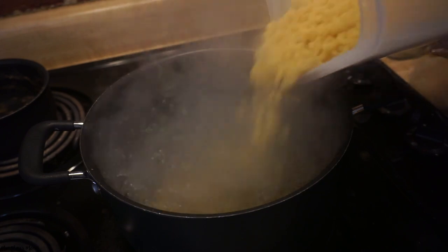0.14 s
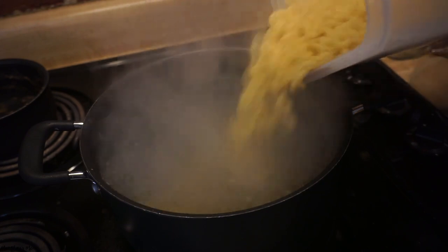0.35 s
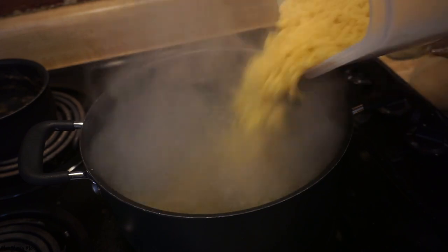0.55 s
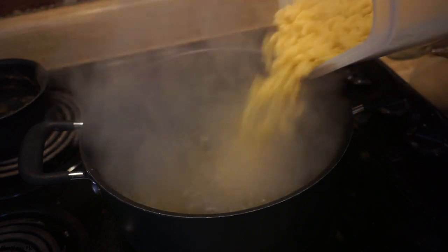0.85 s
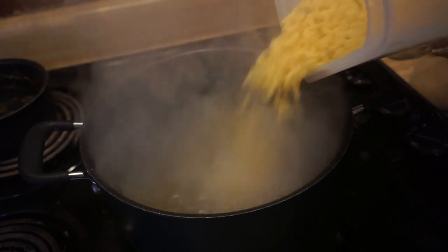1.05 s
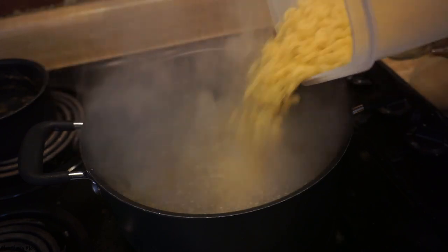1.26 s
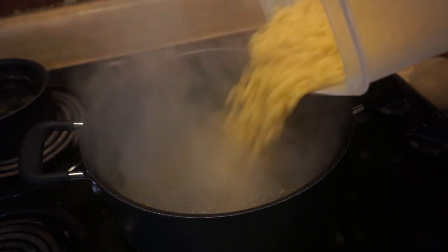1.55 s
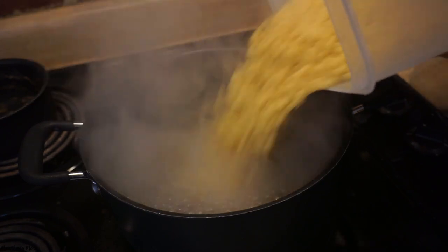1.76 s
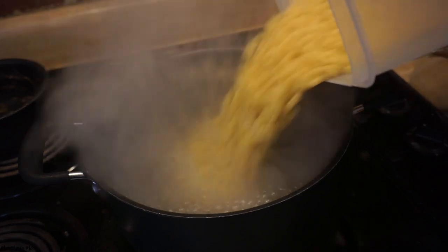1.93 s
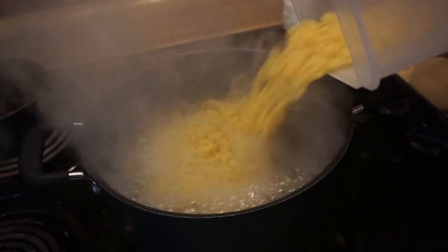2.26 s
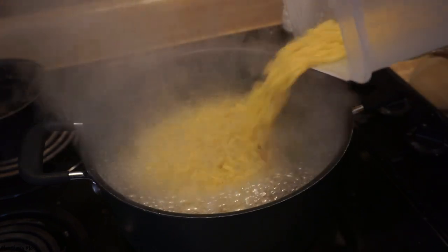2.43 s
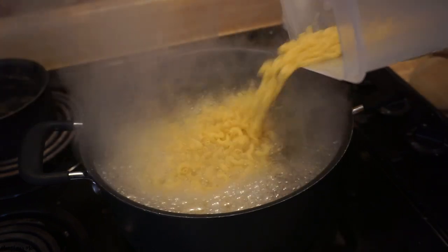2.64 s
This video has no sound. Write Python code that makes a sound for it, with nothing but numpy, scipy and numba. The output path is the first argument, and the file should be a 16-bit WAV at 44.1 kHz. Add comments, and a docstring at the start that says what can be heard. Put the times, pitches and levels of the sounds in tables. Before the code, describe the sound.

A tub of small dry pasta streams into a steaming pan, splashing, ticking and fizzing

```python
"""Kitchen: dry pasta pours from a plastic tub into a pan of boiling water, heard close up.
Showers of short damped sines make the drumming, splashes, ticks, fizz and cracks; they clump together.
Resonances of the pan ring with them, and the loudest pieces are placed singly.
The drumming dies away as the heap builds up and the dry ticks remain.
A short diffuse echo follows; hum and a stronger rumble lie underneath, on a set, mostly sinking level curve."""
import sys
import numpy as np
from scipy import signal
from scipy.fft import rfft, irfft
from scipy.io import wavfile
from scipy.ndimage import uniform_filter1d
from numba import njit

SR = 44100
rng = np.random.default_rng(int(sys.argv[2]) if len(sys.argv) > 2 else 0)


def digitize_waveform(pressure):
    """Quantize a signal to 16-bit integers and store it at the path in sys.argv[1].

    Rows of a 2-D input are taken as channels; values are limited to [-1, 1].
    """
    field = np.atleast_2d(pressure).T
    bounded = np.clip(field, -1, 1)
    quanta = np.round(bounded * 32767).astype(np.int16)
    wavfile.write(sys.argv[1], SR, quanta)


def decibels_to_gain(level_db):
    """Convert a level in decibels to a linear amplitude gain (20 dB per decade)."""
    exponent = np.asarray(level_db, float) / 20
    return 10 ** exponent


N = 123479

# flow of the pasta: (time [s], level [dB])
POUR = [(0, -22), (.03, -26), (.06, -22), (.09, -27), (.115, -23.5), (.16, -21), (.203, -24), (.211, -19.5),
        (.26, -19.5), (.3, -18.5), (.345, -23.5), (.39, -20.5), (.44, -19.5), (.5, -19.5), (.55, -18),
        (.62, -20), (.68, -20.5), (.72, -20), (.78, -19.5), (.825, -21.5), (.86, -20), (.93, -20),
        (1.0, -21), (1.04, -22), (1.07, -19), (1.1, -20.5), (1.145, -25.5), (1.18, -19), (1.23, -23),
        (1.253, -22), (1.27, -20), (1.33, -21), (1.45, -19), (1.6, -18.5), (1.71, -17), (1.73, -21.5),
        (1.85, -20), (1.92, -21), (2.0, -21), (2.13, -24), (2.3, -22.5), (2.4, -21.5), (2.5, -20),
        (2.6, -21), (2.64, -20), (2.665, -22), (2.68, -22.5), (2.72, -21.5), (2.737, -22), (2.75, -25.5),
        (2.78, -18.5), (2.8, -22.5)]
# make-up of the stream: (time [s], drumming, splashes, ticks, fizz [dB re stream], clumping scale [dB])
MIX = [(0, -6.5, -4, -5.5, -4.5, 2.4), (.35, -8.5, -3, -8, -5.5, 1.4), (.7, -13.5, -5, -7, -6, 1.45),
       (1.1, -10, -3, -5.5, -5, 1.57), (1.5, -14.5, -4.5, -5.5, -5.5, 1.2),
       (1.69, -18, -6.5, -6.5, -3.5, 0.61), (1.73, -16.5, -5.5, -6.5, 0, 1), (1.9, -17, -6, -5, -1, 0.53),
       (2.2, -18, -6, -1, 2.5, 0.39), (2.5, -25.5, -12, -7.5, -4, 0.89), (2.8, -23.5, -9.5, -6, -6.5, 1.8)]


def curve(table, col):
    """One column of a time table, per sample."""
    rows = np.array(table)
    return np.interp(np.arange(N) / SR, rows[:, 0], rows[:, col])


def on_hz(table, hz):
    """A (frequency, value) table read on a log axis."""
    rows = np.array(table)
    return np.interp(np.log(hz + 1), np.log(rows[:, 0] + 1), rows[:, 1])


def colour(x, db_of_hz):
    """Causal minimum-phase filter with the given gain in dB, built from the cepstrum."""
    size = 8192
    log_gain = np.log(decibels_to_gain(db_of_hz(np.fft.rfftfreq(size, 1 / SR))))
    cepstrum = irfft(log_gain)
    cepstrum[1:size // 2] *= 2
    cepstrum[size // 2 + 1:] = 0
    impulse = irfft(np.exp(rfft(cepstrum)))
    return signal.fftconvolve(x, impulse[None], axes=1)[:, :N]


def walk(rate_hz):
    """Random levels held 1 / rate_hz and slewed, with no slow drift; standard deviation 1."""
    hold = max(int(SR / rate_hz), 2)
    steps = np.repeat(rng.standard_normal(N // hold + 1), hold)
    slewed = uniform_filter1d(steps, hold)[:N]
    steady = slewed - uniform_filter1d(slewed, size=5 * hold)
    return steady / steady.std()


@njit
def ring(start, hz, decay_s, left, right, lead_rad):
    """Each grain is a damped sine with a level per channel and a phase lead in the left."""
    out = np.zeros((2, N))
    for k in range(len(start)):
        step = np.exp(2j * np.pi * hz[k] / SR - 1 / (decay_s[k] * SR))
        z, turn = 1 + 0j, np.exp(1j * lead_rad[k])
        for i in range(start[k], min(N, start[k] + int(5 * decay_s[k] * SR))):
            out[0, i] += left[k] * (z * turn).imag
            out[1, i] += right[k] * z.imag
            z *= step
    return out


def shower(count, lo_hz, hi_hz, decay_ms, scatter_db, spread_db, lag_us):
    """Many grains at random times and pitches, from scattered places; a few are much bigger."""
    when, pitch, rank = rng.random((count, 3)).T
    decay_dev, pan_dev, lag_dev = rng.standard_normal((count, 3)).T
    hz = lo_hz + (hi_hz - lo_hz) * pitch
    decay_s = decay_ms / 1000 * np.exp(0.21 * decay_dev)
    size = decibels_to_gain(-scatter_db * np.log(1.012 - rank)) / np.sqrt(decay_s)
    left = size * decibels_to_gain(spread_db * pan_dev / 2)
    right = size * decibels_to_gain(-spread_db * pan_dev / 2)
    lead_rad = 2 * np.pi * hz * lag_us * 1e-6 * lag_dev
    return ring((when * N).astype(np.int64), hz, decay_s, left, right, lead_rad)


def layer(x, table, col, db):
    """Colours a shower, sets the rms of its mid to 1 and lets it follow the stream."""
    x = colour(x, lambda hz: on_hz(table, hz))
    mid_rms = np.sqrt(np.mean(x.mean(axis=0) ** 2))
    return x / mid_rms * decibels_to_gain(curve(POUR, 1) + curve(MIX, col) + db)


def singles(table, decay_ms, trim_db):
    """The loudest pieces, one centred damped sine each, without bass."""
    low_cut_hz = 700
    s, level_db, hz = np.array(table, float).T
    size = decibels_to_gain(level_db + trim_db)
    x = ring((s * SR).astype(np.int64), hz, 0 * s + decay_ms / 1000, size, size, 0 * s)
    return signal.sosfilt(signal.butter(3, low_cut_hz, "high", fs=SR, output="sos"), x)


def stream():
    """All layers clump together, the pan rings with them, and the loudest pieces stand on top."""
    clumps_db = curve(MIX, 5) * (.2 * walk(45) + .8 * walk(150))
    out = drumming(clumps_db) + splashes(clumps_db) + ticks(clumps_db) + fizz(clumps_db)
    out = pan_ringing(out + cracks(clumps_db))
    return out + loudest_pieces()


def drumming(clumps_db):
    """Pieces plunge and drum the pan: low grains, the longest of all, that clump weakly."""
    # (frequency [Hz], gain [dB])
    drum_gain = [(120, -46), (200, -19), (231, -16), (355, -2), (436, -9.5), (613, -12.5), (808, -0.5),
                 (876, -4), (958, 1.5), (1360, -3.5), (1850, -2), (2210, -4), (3740, -120)]
    grains = shower(count=12000, lo_hz=98, hi_hz=1991, decay_ms=3.1,
                    scatter_db=0.67, spread_db=-0.8, lag_us=75)
    return layer(grains, drum_gain, col=1, db=0.3 * clumps_db)


def splashes(clumps_db):
    """Water thrown up: dense mid-range grains with a flicker of their own."""
    # (frequency [Hz], gain [dB])
    splash_gain = [(820, -26.5), (1400, -15), (1860, -6), (2300, -3), (2700, -5), (3900, -1.5),
                   (6500, -7.5), (8450, -13), (14300, -120)]
    grains = shower(count=26000, lo_hz=990, hi_hz=7100, decay_ms=0.86,
                    scatter_db=0.33, spread_db=3.5, lag_us=28.3)
    flicker_db = .4 * curve(MIX, 5) * walk(90)
    return layer(grains, splash_gain, col=2, db=clumps_db + flicker_db)


def ticks(clumps_db):
    """Dry pieces tick against each other: very short treble grains with their own flicker."""
    # (frequency [Hz], gain [dB])
    tick_gain = [(3240, -33), (5500, -11.5), (11500, -7), (15000, -52), (22000, -120)]
    grains = shower(count=16000, lo_hz=5160, hi_hz=11520, decay_ms=0.29,
                    scatter_db=0.5, spread_db=5.5, lag_us=14.6)
    flicker_db = .7 * curve(MIX, 5) * walk(60)
    return layer(grains, tick_gain, col=3, db=clumps_db + flicker_db)


def fizz(clumps_db):
    """Fizz in the top treble: dense grains of uneven size with their own flicker."""
    # (frequency [Hz], gain [dB])
    fizz_gain = [(7000, -30), (10500, -20), (12000, 3), (13200, 4.5), (14500, 4.5), (15300, 8), (15900, -4),
                 (17000, -10)]
    grains = shower(count=22000, lo_hz=9400, hi_hz=17900, decay_ms=0.46,
                    scatter_db=1.5, spread_db=1.0, lag_us=13.0)
    flicker_db = .9 * curve(MIX, 5) * walk(45)
    return layer(grains, fizz_gain, col=4, db=clumps_db + flicker_db)


def cracks(clumps_db):
    """Sparse sharp cracks: the shortest grains, differentiated to sharpen their onsets."""
    grains = shower(count=500, lo_hz=2500, hi_hz=9000, decay_ms=0.15,
                    scatter_db=1.5, spread_db=4.0, lag_us=5)
    sharp = np.diff(grains, prepend=0)
    return sharp / sharp.std() * decibels_to_gain(curve(POUR, 1) + clumps_db - 13)


def pan_ringing(dry_stream):
    """Resonances of the pan and its air boost the stream; their pitch rises as the pan fills."""
    # resonances of the empty pan: (frequency [Hz], width [Hz], full boost [dB])
    pan_modes = [(370, 40, 1.5), (806, 84, 5), (1183, 55, 2.5), (2264, 37, 6), (2410, 127, 6.5),
                 (2954, 116, 5.5), (3490, 66, 4), (3890, 44, 0.5)]
    # (time [s], mean share of ringing [0-1], mean share of the rise in pitch [0-1])
    pan_shares = [(0, 1, 0), (1.3, 1, .2), (1.7, .9, 1), (1.85, .5, 1), (2.8, .45, 1)]
    full_pitch_ratio = 1.045

    def resonate(ratio):
        return colour(dry_stream, lambda hz: sum(
            db / (1 + (2 * (hz / ratio - f) / w) ** 2) for f, w, db in pan_modes))

    empty, full = resonate(1), resonate(full_pitch_ratio)
    fill = np.clip(curve(pan_shares, 2) + .35 * walk(9), 0, 1)
    rung = empty + fill * (full - empty)
    share = curve(pan_shares, 1) * np.clip(1 + .4 * walk(14), 0, 2)
    return dry_stream + share * (rung - dry_stream)


def loudest_pieces():
    """Single cracks, splashes and ticks that stand out, each a damped sine at a set time."""
    # all three: (time [s], level before trim [dB], frequency [Hz])
    single_cracks = [(.081, -14, 9000), (.1197, -12, 4750), (.1324, -17, 3000), (.1465, -7, 5800),
                     (.209, -10, 4000), (.2409, -5, 3930), (.2618, -8, 5000), (.2964, -13, 7400),
                     (1.2036, -13, 6010), (1.2073, -11, 8000), (1.256, -11, 4530), (1.2805, -10, 4200),
                     (1.3198, -8, 5500), (2.7105, -12, 6500), (2.761, -16, 6000)]
    single_splashes = [(0.049, -8, 2480), (0.2074, 0.5, 2300), (0.4174, -10, 2480), (0.7602, -7, 2970),
                       (0.8355, -5, 2430), (1.0595, -4, 3100), (1.0987, -9, 2400), (1.1727, -9, 2200),
                       (1.2795, -10, 3490), (1.77, -4, 3600), ]
    single_ticks = [(0.1715, -14, 8590), (0.2326, -13, 13800), (0.3207, -14, 9000), (0.4743, -11, 11900),
                    (0.588, -10, 12800), (0.617, -7.5, 13200), (0.8505, -13.5, 8200), (0.9782, -12, 9400),
                    (1.0819, -14, 12700), (1.2351, -11, 13400), (1.2605, -10, 14600), (1.3254, -6, 15200),
                    (1.3693, -14, 7400), (1.406, -8, 14100), (1.5125, -8, 15200), (2.1355, -5.5, 14600),
                    (2.3451, -13, 15100), (2.6224, -12, 14500)]
    return (singles(single_cracks, decay_ms=0.29, trim_db=4)
            + singles(single_splashes, decay_ms=1.0, trim_db=-6.0)
            + singles(single_ticks, decay_ms=0.69, trim_db=6.0))


def echo(near):
    """Short diffuse echo off hob and tiles: decaying noise with little bass, one per channel."""
    t60_s, level_db, low_cut_hz = .12, -13, 700
    t = np.arange(SR // 4) / SR
    decay = np.exp(-np.log(1000) * t / t60_s) * (t > .002)
    tail = rng.standard_normal((2, len(t))) * decay
    tail = signal.sosfilt(signal.butter(1, low_cut_hz, "high", fs=SR, output="sos"), tail)
    tail = tail * decibels_to_gain(level_db) / np.sqrt(np.sum(tail ** 2, axis=1, keepdims=True))
    return signal.fftconvolve(near, tail, axes=1)[:, :N]


def hum():
    """Appliance hum (two sine partials) and a noise rumble stronger than it, on one set level curve."""
    # (time [s], level [dB])
    background_level = [(0.0, -49), (0.03, -52.5), (0.55, -57.5), (0.58, -64.5), (1.32, -60), (1.43, -70.5),
                        (2.19, -80), (2.8, -74)]
    # (multiple of the fundamental, rms re background level [dB])
    hum_partials = [(1, -2.5), (2, -4)]
    # (frequency [Hz], gain [dB])
    rumble_gain = [(20, -20), (45, -18), (60, -5), (75, -11), (150, 5.5), (250, -11), (500, 6), (1000, -7)]
    hum_hz, rumble_db = 117, 11
    t = np.arange(N) / SR
    lines = sum(decibels_to_gain(db) * np.sin(2 * np.pi * k * hum_hz * t) for k, db in hum_partials) * np.sqrt(2)
    mid, side = colour(rng.standard_normal((2, N)), lambda hz: on_hz(rumble_gain, hz))
    wide = mid + .8 * side * np.array([[1], [-1]])
    rumble = wide / mid.std() * decibels_to_gain(rumble_db + 1.5 * walk(12))
    return (lines + rumble) * decibels_to_gain(curve(background_level, 1))


def scene():
    """The stream without deep bass, its echo, and the hum with its rumble."""
    pan_floor_hz = 200
    low_cut = signal.butter(4, pan_floor_hz, "high", fs=SR, output="sos")
    near = signal.sosfilt(low_cut, stream())
    return near + echo(near) + hum()


def band_limit(x):
    """A steep low-pass at the top of the band."""
    return signal.sosfilt(signal.butter(12, 17070, fs=SR, output="sos"), x)


def record(dry):
    """Two close microphone ports: their difference is narrowed below about 630 Hz, but the right is mostly
    louder, the bass included, and the phase differs; the top is cut."""
    # (frequency [Hz], left minus right [dB])
    port_balance = [(110, -4), (200, -2.5), (380, -0.5), (700, -1.5), (1290, -0.5), (2380, -4), (4400, 0.5),
                    (8120, -2), (15000, -4)]
    # (frequency [Hz], phase by which left leads right [rad])
    port_phase = [(500, 0.084), (1300, -0.5), (3300, 0.27), (6800, -0.062), (16000, -1.15)]
    side_from_hz, top_hz = 630, 15850
    hz = np.fft.rfftfreq(N + SR, 1 / SR)
    left, right = rfft(dry, N + SR, axis=1)
    mid = (left + right) / 2
    side = (left - right) / 2 * hz / np.hypot(hz, side_from_hz)
    tilt = decibels_to_gain(on_hz(port_balance, hz) / 2) * np.exp(.5j * on_hz(port_phase, hz))
    wet = irfft(np.array([(mid + side) * tilt, (mid - side) / tilt]), N + SR, axis=1)[:, :N]
    wet = signal.sosfilt(signal.ellip(12, .3, 80, top_hz, fs=SR, output="sos"), wet)
    return band_limit(wet)


dry = scene()
out = record(dry)
digitize_waveform(out)
```